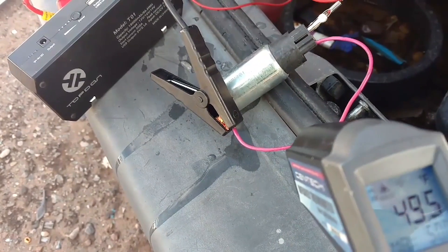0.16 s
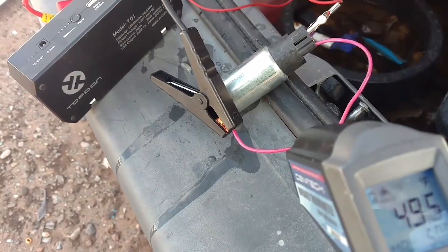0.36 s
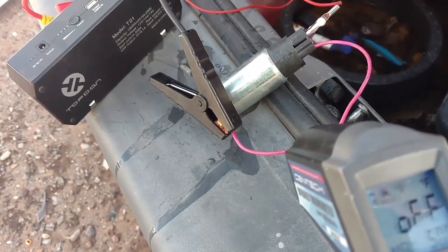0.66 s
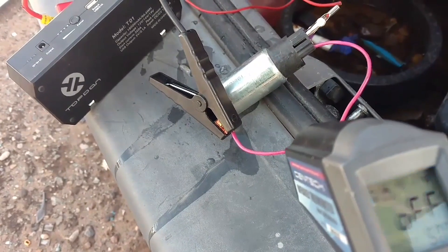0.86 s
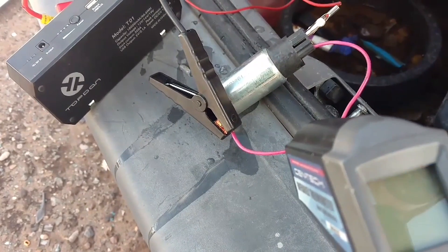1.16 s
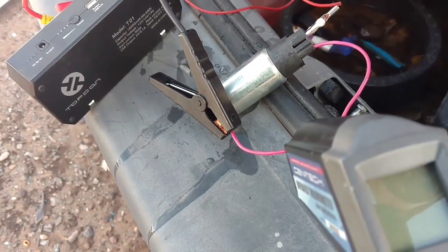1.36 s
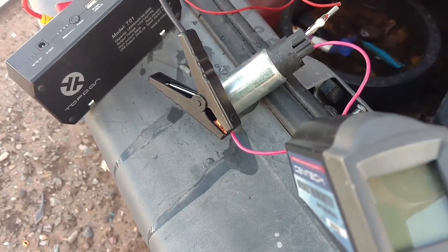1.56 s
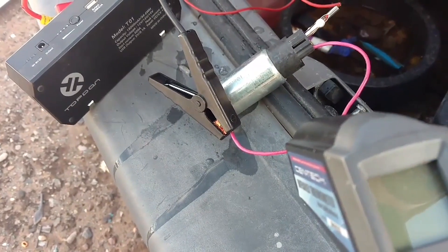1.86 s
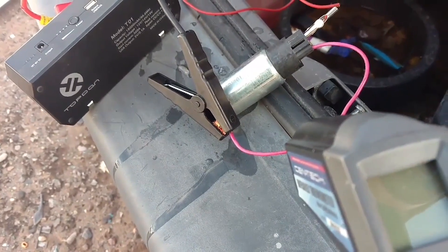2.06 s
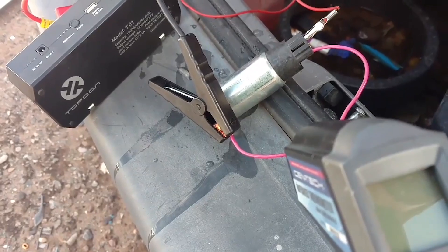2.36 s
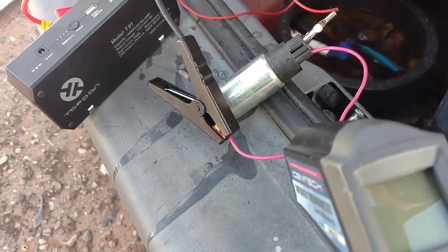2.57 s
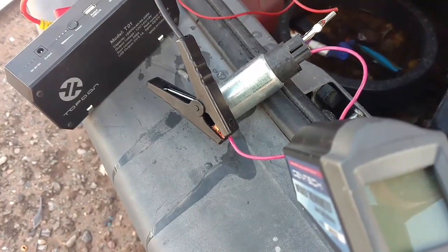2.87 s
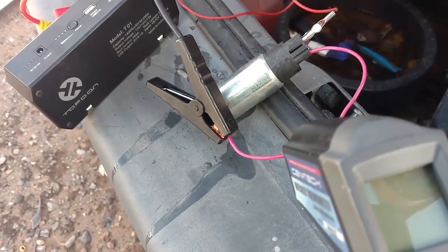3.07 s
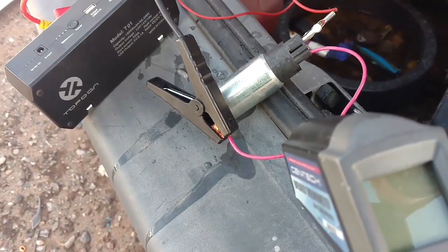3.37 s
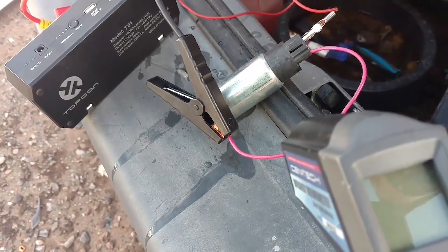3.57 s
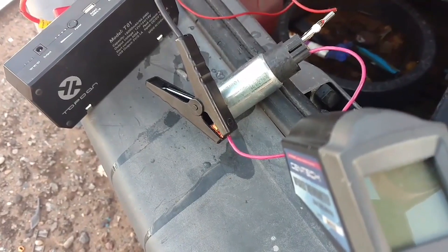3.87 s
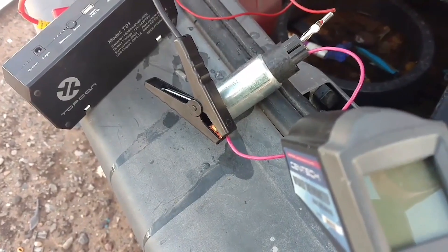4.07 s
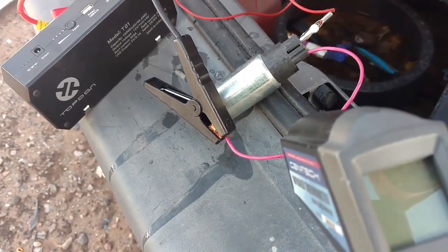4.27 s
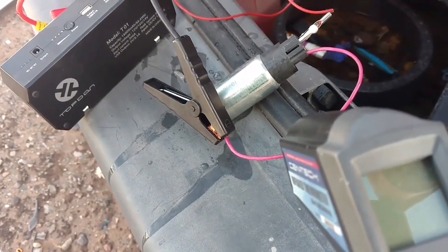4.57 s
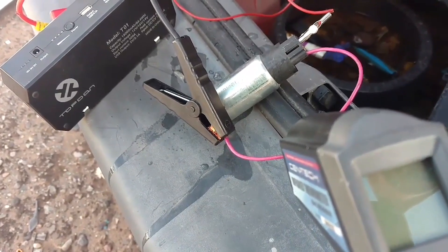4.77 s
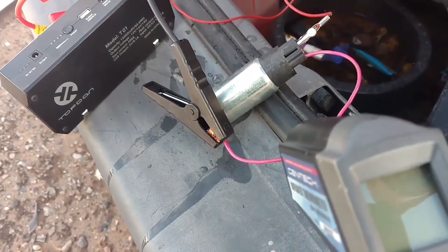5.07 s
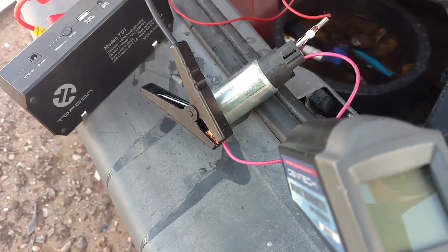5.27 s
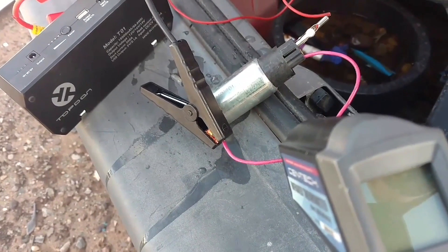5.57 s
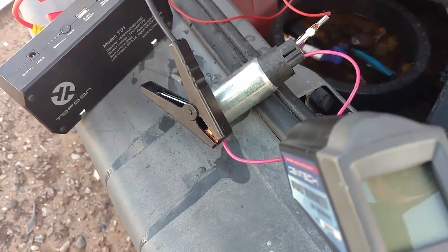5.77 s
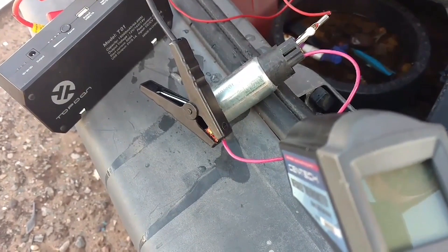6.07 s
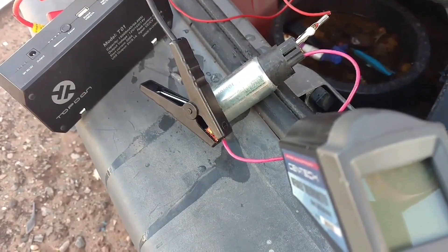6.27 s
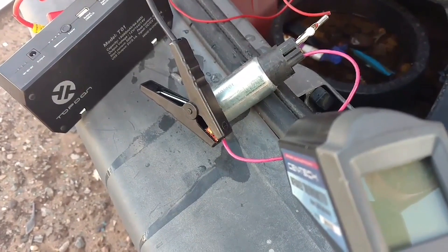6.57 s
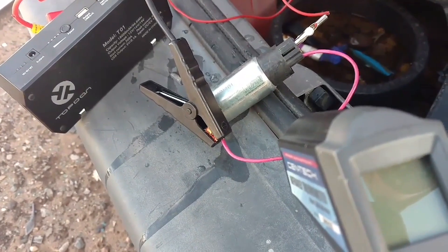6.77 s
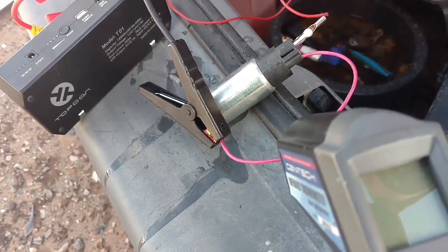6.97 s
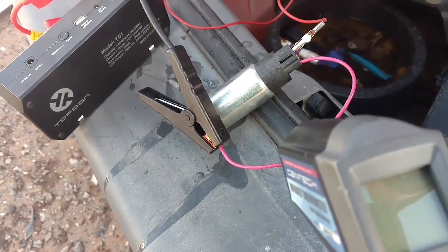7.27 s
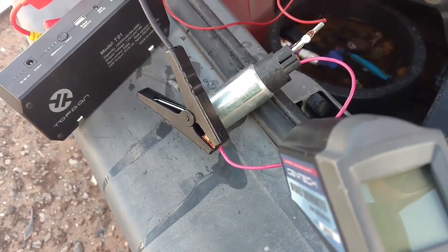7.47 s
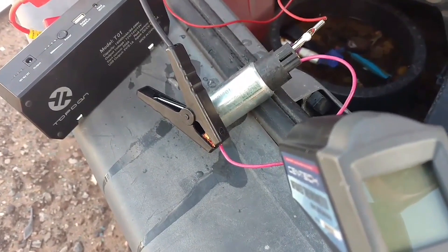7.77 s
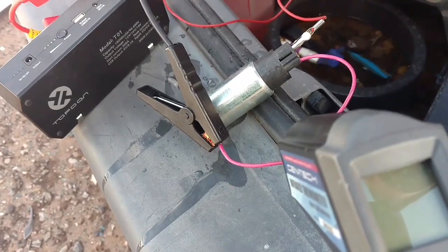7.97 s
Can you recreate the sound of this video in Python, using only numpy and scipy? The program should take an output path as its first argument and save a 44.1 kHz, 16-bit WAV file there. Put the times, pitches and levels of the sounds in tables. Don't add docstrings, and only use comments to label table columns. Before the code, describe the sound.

A small metal electric pump runs dry and close by throughout, giving a thin, piercing, slightly wavering whistle with grainy hiss and faint hum. Its loose rotor rattles the hollow case in uneven bursts. Low wind puffs bump a handheld stereo microphone outdoors, hardest near three seconds, briefly dipping the level. Later the wind fades and the rattling stands out with brighter chatter.

```python
import sys
import numpy as np
from scipy import signal
from scipy.fft import rfft, irfft, next_fast_len
from scipy.io import wavfile
from scipy.ndimage import uniform_filter1d, map_coordinates

SR = 44100
rng = np.random.default_rng(int(sys.argv[2]) if len(sys.argv) > 2 else 0)


def master_out(mix):
    frames = np.transpose(np.atleast_2d(mix))
    ceiling = np.clip(frames, -1, 1)
    pcm = np.round(ceiling * 32767).astype(np.int16)
    wavfile.write(sys.argv[1], SR, pcm)


def volts_from_db(level):
    exponent = np.asarray(level, float) / 20
    return 10 ** exponent


N = 358533
T = np.arange(N) / SR

# (time [s], level [dB])
WIND_LEVEL = [(0, -34.5), (.2, -43.5), (.4, -31.5), (.56, -39), (.66, -28), (.85, -40.5), (1.05, -32),
              (1.24, -42), (1.55, -41), (2.33, -45), (2.48, -34.5), (2.64, -45.5), (3.0, -31), (3.9, -42),
              (4.35, -53), (5.25, -44), (6.0, -59), (8.13, -55.5)]


def unit(x):
    return x / np.sqrt(np.mean(x ** 2) + 1e-20)


def along(points, hz):
    f, v = np.transpose(points)
    return np.interp(np.log(hz + 1), np.log(f + 1), v)


def curves(rows):
    s, *columns = np.transpose(rows)
    return [np.interp(T, s, column) for column in columns]


def swells(rows):
    s, length, *sizes = np.transpose(rows)
    coarse = T[::64]
    bells = np.exp(-.5 * ((coarse - s[:, None]) / length[:, None]) ** 2)
    return [np.interp(T, coarse, size @ bells) for size in sizes]


def wobble(rate):
    coarse = T[::64]
    knots = rng.standard_normal(int(N * rate / SR) + 4)
    return np.interp(T, coarse, map_coordinates(knots, [coarse * rate]))


def filtered(x, response):
    m = next_fast_len(N + SR // 4)
    return irfft(rfft(x, m) * response(np.fft.rfftfreq(m, 1 / SR)), m)[..., :N]


def modes(rows):
    def response(f):
        return sum((-1) ** k * volts_from_db(db) * 1j * f * width / (centre * centre - f * f + 1j * f * width)
                   for k, (centre, width, db) in enumerate(rows))
    return response


def ports(x):
    # (frequency [Hz], excess [dB])
    port_balance = [(300, 1.5), (1200, 0), (1900, 0), (2300, -5), (2600, 0), (3100, 9), (3900, 0),
                    (4500, -7), (5200, 0), (5900, 5), (6500, 0), (7600, 5), (9250, 0), (11300, 3),
                    (12000, 0)]
    # (frequency [Hz], phase [half turns])
    port_lead = [(200, -.8), (320, -.35), (900, -.2), (1450, 0), (2500, 1), (3900, 2), (5050, 3), (6550, 4),
                 (7800, 5), (9300, 6), (10650, 7), (12100, 8), (13000, 9), (14000, 10), (15000, 11)]

    def right_path(hz):
        lead = np.pi * np.interp(hz, *np.transpose(port_lead))
        return volts_from_db(-along(port_balance, hz)) * np.exp(-1j * lead)

    return np.array([x, filtered(x, right_path)])


def rotation():
    # (time [s], shaft speed [Hz], whistle level [dB])
    warm_up = [
        (0.0, 179.29, -30.61),
        (1.16, 178.16, -27.56),
        (2.32, 177.96, -27.71),
        (3.48, 180.33, -26.77),
        (4.65, 181.54, -27.15),
        (5.81, 180.05, -29.56),
        (6.97, 182.99, -25.85),
        (8.13, 184.47, -28.45),
    ]
    # (time [s], length [s], speed change [Hz], whistle change [dB])
    surges = [(0.009, 0.025, -0.9, -0.8), (0.215, 0.047, -1.27, 0.4), (0.59, 0.16, 0.55, 1.6),
              (0.762, 0.068, -0.97, -1.9), (0.976, 0.045, -0.82, -1.1), (1.272, 0.044, -0.4, -2.6),
              (1.397, 0.046, 2.13, 0.1), (1.782, 0.026, 0.83, 1.6), (1.851, 0.16, 0.89, -1.8),
              (2.486, 0.05, 1.12, -0.8), (2.664, 0.078, -1.15, -1.8), (2.973, 0.085, -0.51, -2.4),
              (3.604, 0.051, 0.97, -1.8), (3.662, 0.046, -1.02, 1.2), (4.096, 0.122, 2.96, -0.9),
              (4.205, 0.131, -2.54, -0.7), (4.483, 0.035, 0.14, -2.2), (4.646, 0.047, -0.77, -3.4),
              (5.447, 0.158, 1.06, 2.0), (5.873, 0.052, 3.04, 1.6), (6.098, 0.026, -1.72, 1.1),
              (6.205, 0.066, -1.82, 1.3), (6.323, 0.16, 2.99, 0.5), (6.623, 0.052, -0.86, -1.5),
              (6.958, 0.025, -0.2, -3.1), (7.181, 0.119, -2.14, -7.1), (7.213, 0.067, 0.55, 6.4),
              (7.809, 0.028, -0.73, 1.1), (7.963, 0.065, 0.54, 2.0), (8.064, 0.12, -3.01, -0.3)]
    warm_hz, warm_db = curves(warm_up)
    surge_hz, surge_db = swells(surges)
    turns = np.cumsum(warm_hz + surge_hz + .19 * wobble(32) + .12 * wobble(14)) / SR
    return turns, warm_db + surge_db


def tone(turns, order, db, pan_db, lead, flutter_db):
    flutter = wobble(85)
    spin = volts_from_db(db + flutter_db * flutter) * np.exp(2j * np.pi * (order * turns + rng.random()))
    right = spin * volts_from_db(-pan_db) * np.exp(-1j * lead)
    return np.sqrt(2) * np.array([spin.imag, right.imag])


def whine(turns, whistle_db):
    vane_orders = [47, 46, 48, 45, 49]
    # (level re whistle [dB], left over right [dB], left lead [rad])
    vane_tones = [
        (1.5, 9, -1.96),
        (-27.5, -6.5, -2.5),
        (-28, -3.5, -1),
        (-32, -1, -0.5),
        (-58, 0, 54),
    ]
    winding_orders = [7, 8, 6, 11, 16, 24]
    # (level [dB], left over right [dB], left lead [rad])
    winding_tones = [
        (-62, 1, -0.38),
        (-67, -10, 0.38),
        (-68, -5, -0.23),
        (-71, -10.5, 0.32),
        (-60.5, 31, 0.2),
        (-62, 31, .1),
    ]
    # (time [s], 32nd order level [dB], first order level [dB])
    slot_levels = [
        (0, -51, -48),
        (1.5, -49.5, -52),
        (3.5, -44.5, -51.5),
        (5, -41.5, -50.5),
        (8.13, -43, -52),
    ]
    vanes = sum(tone(turns, order, whistle_db + db, pan, lead, flutter_db=1.15 - .08 * db)
                for order, (db, pan, lead) in zip(vane_orders, vane_tones))
    hum = sum(tone(turns, order, *row, flutter_db=3.0) for order, row in zip(winding_orders, winding_tones))
    slots_db, unbalance_db = curves(slot_levels)
    hum += tone(turns, order=1, db=unbalance_db, pan_db=12.0, lead=0.15, flutter_db=3.0)
    return vanes + hum + tone(turns, order=32, db=slots_db, pan_db=14.0, lead=-0.76, flutter_db=1.0)


def rattle(turns):
    # (time [s], length [s], level over the resting rattle [dB])
    bouts = [(0.101, 0.036, 3.5), (0.49, 0.13, 6), (0.65, 0.062, 5), (0.873, 0.036, 5), (1.19, 0.02, 7),
             (1.382, 0.044, 4.5), (1.742, 0.21, 3.5), (1.921, 0.11, 2.5), (2.159, 0.043, 5.5),
             (2.445, 0.046, 7), (2.885, 0.082, 8), (3.247, 0.054, 6.5), (3.536, 0.073, 8.5),
             (3.916, 0.26, 6.0), (4.639, 0.032, 4), (5.057, 0.14, 8), (5.388, 0.017, 10), (5.51, 0.079, 5),
             (5.827, 0.12, 8.5), (6.319, 0.15, 13.5), (6.523, 0.026, 5.5), (6.909, 0.03, 8),
             (7.066, 0.025, 5.5), (7.246, 0.048, 8.5), (7.739, 0.18, 9), (8.057, 0.03, 4.5)]
    # (centre [Hz], width [Hz], level [dB])
    case_modes = [
        (344.7, 11.2, 6.5),
        (547, 35.4, -8.5),
        (886, 120, -25.5),
    ]
    # (time [s], level [dB], length [s])
    chatter_bursts = [(4.03, -34, 0.0084), (4.451, -63, 0.022), (4.505, -61, 0.018), (4.813, -38, 0.006),
                      (5.11, -37, 0.016), (5.406, -33, 0.0058), (6.513, -37, 0.016), (6.889, -46, 0.018),
                      (7.06, -40.5, 0.017), (7.267, -37.5, 0.017), (7.538, -43, 0.024),
                      (7.993, -44, 0.0041), (8.038, -36.5, 0.022)]
    rest_db, bout_growth = -54.5, 1.23
    rattle_db = rest_db + bout_growth * swells(bouts)[0]

    at = np.flatnonzero(np.diff(np.floor(turns)))
    luck = rng.standard_normal((len(at), 2))
    luck *= np.clip(volts_from_db(-.8 * (rattle_db[at] + 43)), .3, 1.6)[:, None]
    moments = np.clip(at + (6 * luck[:, 0]).astype(int), 0, N - 1)
    knocks = np.bincount(moments, volts_from_db(2.86 * luck[:, 1]), N)

    body = unit(filtered(knocks, lambda hz: modes(case_modes)(hz) * (hz / (hz + 300)) ** 2))
    shake = unit(filtered(rng.standard_normal(N), modes([(364, 220, -13.5), (585, 160, 0.5)])))
    body += volts_from_db(-5.0 - .5 * (rattle_db + 55)) * shake

    bursts = sum(volts_from_db(db) * np.exp(-.5 * ((T - s) / length) ** 2) for s, db, length in chatter_bursts)
    gritty = knocks + 0.056 * rng.standard_normal(N)
    bright = unit(filtered(gritty, lambda hz: modes([(2500, 650, 0)])(hz) ** 2))
    chatter = volts_from_db(-6.0) * bursts * bright
    ringing = volts_from_db(rattle_db + 4.5 + 1.53 * wobble(16)) * body
    return ports(ringing + chatter) + volts_from_db(-3.0) * chatter


def hiss(turns, whistle_db):
    # (frequency [Hz], density [dB per Hz])
    air_spectrum = [(60, -9), (450, 2.5), (1000, -5), (1900, -7), (2900, 4), (4500, -7), (6500, -10),
                    (7400, -4), (8900, -5.5), (9200, -9.5), (10300, -2), (12050, -9), (12700, -23),
                    (14000, -20), (15000, -7.5)]
    # (time [s], length [s], level [dB])
    brush_rubs = [
        (.6, 0.065, 0),
        (1.0, 0.047, 2.5),
        (2.75, 0.052, 2),
        (3.0, 0.15, 1),
        (4.42, 0.19, 2.5),
        (5.0, 0.2, 1.5),
        (5.8, 0.04, -0.5),
        (6.8, 0.089, 0),
    ]
    z = signal.stft(rng.standard_normal((3, N)), nperseg=512)[2]
    patches = uniform_filter1d(rng.standard_normal(z.shape[1:]), size=8, axis=0)
    patches = uniform_filter1d(patches, size=10, axis=1)
    noise = signal.istft(z * volts_from_db(0.96 * unit(patches)), nperseg=512)[1][:, :N]
    pulsed = noise * (1 + 0.089 * np.cos(2 * np.pi * turns))
    noise = filtered(pulsed, lambda hz: volts_from_db(along(air_spectrum, hz)))

    rub_db, = swells(brush_rubs)
    level_db = -43 + 0.83 * (whistle_db - whistle_db.mean()) + 0.72 * rub_db
    low_db = -2.72 + 0.87 * rub_db
    low = filtered(noise, lambda hz: hz < 5100)
    noise = noise - low + low * volts_from_db(low_db - 1.5)
    scale = volts_from_db(level_db + 5.5 + 0.7 * wobble(9)) / np.std(noise[0])
    return scale * (ports(noise[0]) + volts_from_db(-8.0) * noise[1:])


def eddies():
    gap_s, low_hz, high_hz = .12, 106, 174
    level_db, follows, spread_db = -27.5, 0.72, 8
    luck = rng.random((int(N / SR / gap_s), 3))
    s = (np.arange(len(luck)) + luck[:, 0]) * gap_s
    wind_db = np.interp(s, *np.transpose(WIND_LEVEL))
    db = level_db + follows * (wind_db + 43) + spread_db * (luck[:, 1] - .5)
    return list(zip(s, db, low_hz + (high_hz - low_hz) * luck[:, 2]))


def wind():
    # (frequency [Hz], density [dB per Hz])
    gust_spectrum = [(15, -33), (40, 1), (70, -2), (130, -2.5), (200, -7.5), (350, -19.5), (700, -40),
                     (1200, -63)]
    # (time [s], peak level [dB], frequency [Hz])
    strong_puffs = [(0.041, -19, 193), (0.344, -14, 169.4), (0.391, -15, 147), (0.486, -18, 114),
                    (0.62, -8.5, 114.5), (0.667, -12, 113), (0.691, -16.5, 143), (0.98, -17, 150),
                    (1.035, -16, 139), (1.09, -15, 160), (1.319, -20, 147), (1.526, -21, 163.4),
                    (1.837, -21, 138.8), (2.476, -25, 170), (2.789, -19.5, 132), (2.845, -8.5, 140),
                    (2.944, -2, 145), (3.016, -11, 184.3), (3.038, -12, 155), (3.134, -13, 117),
                    (3.185, -14, 168), (3.281, -18, 139), (3.305, -12.5, 173), (3.337, -16, 145),
                    (3.405, -17, 134), (3.699, -21, 137), (3.91, -15, 170), (4.67, -15.5, 160.3),
                    (5.212, -18.5, 122), (5.323, -19, 113)]

    def gust(hz):
        return volts_from_db(along(gust_spectrum, hz))

    lumps = volts_from_db(4.5 * wobble(22))
    across = unit(lumps * filtered(rng.standard_normal(N), gust))
    common = unit(lumps * filtered(rng.standard_normal(N), lambda hz: gust(hz) * (hz / (hz + 400)) ** 0.94))
    common = volts_from_db(-12.5) * common - volts_from_db(-25) * across
    across, common = volts_from_db(curves(WIND_LEVEL)[0] + 4.5) * np.array([across, common])

    span = np.arange(-1024, 1024)
    t = span / SR
    puffs = strong_puffs + eddies()
    for (s, db, hz), (turn, skew) in zip(puffs, rng.random((len(puffs), 2))):
        swing = np.exp(-.5 * (t * hz / 0.47) ** 2) * np.cos(2 * np.pi * (hz * t + turn))
        flick = np.exp(-.5 * (t / 0.001) ** 2) * np.cos(2 * np.pi * (1.94 * hz * t + skew))
        flick *= 0.11 * volts_from_db(0.36 * (db + 19.5))
        where = np.clip(round(s * SR) + span, 0, N - 1)
        across[where] += volts_from_db(db - .6) * (swing + flick)
        common[where] += volts_from_db(db - 12.5) * (flick * 5 - 0.63 * swing)
    return filtered(np.array([common + across, common - across]), lambda hz: hz ** 2 / (hz ** 2 + 45 ** 2))


def clamp():
    sing_s, length_s, sing_hz, sing_db = 6.6, 0.13, 1220, -53.5
    swell, = swells([(sing_s, length_s, 1)])
    return volts_from_db(sing_db + 2 * wobble(20)) * swell * np.sin(2 * np.pi * sing_hz * T)


def scene():
    turns, whistle_db = rotation()
    pump = whine(turns, whistle_db + 0.7 * wobble(16)) + rattle(turns) + hiss(turns, whistle_db)
    return pump + wind() + clamp()


def roll_off(x):
    return signal.sosfilt(signal.butter(12, 16100, fs=SR, output="sos"), x)


def record(dry):
    # (time [s], depth [dB], recovery [s])
    gain_ducks = [
        (.625, 2.5, 0.16),
        (2.842, 6, 0.17),
        (2.946, 3, 0.27),
    ]
    duck_db = 0
    for s, depth_db, recovery_s in gain_ducks:
        since = np.clip(T - s, 0, None)
        duck_db = duck_db + depth_db * (1 - np.exp(-since / 0.0054)) * np.exp(-since / recovery_s)
    ducked = dry * volts_from_db(-duck_db)
    limited = ducked / (1 + np.abs(ducked / .4) ** 4) ** (1 / 4)
    return roll_off(limited)


dry = scene()
out = record(dry)
master_out(out)
```